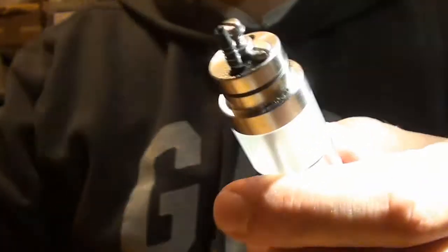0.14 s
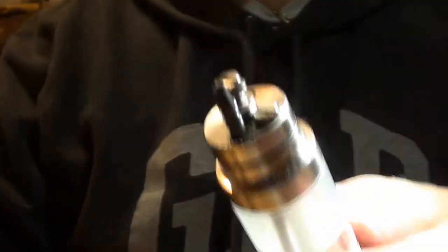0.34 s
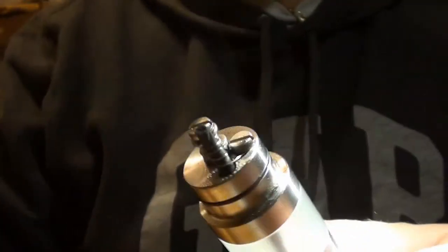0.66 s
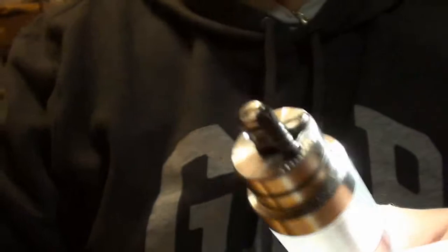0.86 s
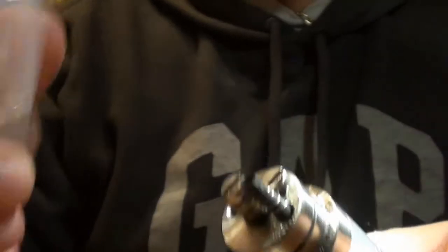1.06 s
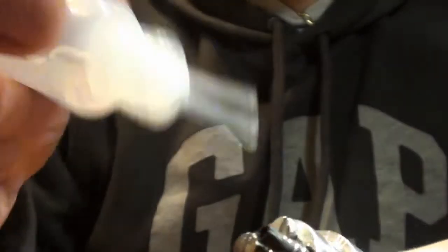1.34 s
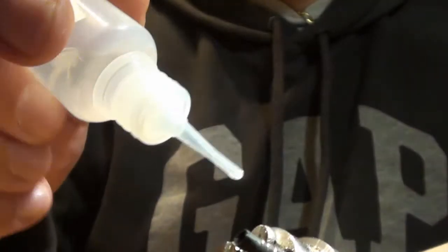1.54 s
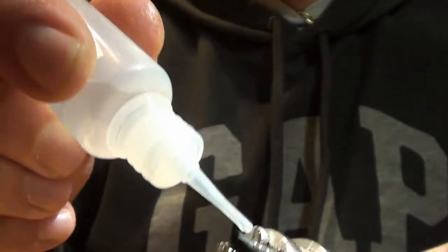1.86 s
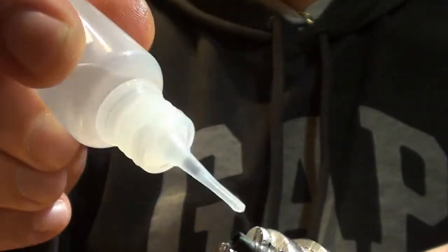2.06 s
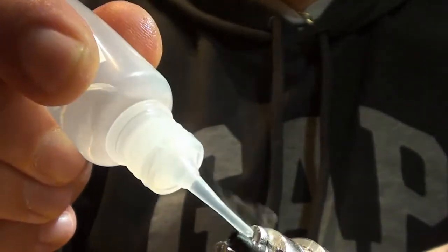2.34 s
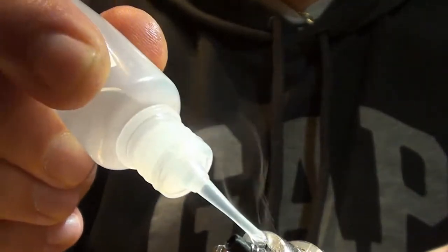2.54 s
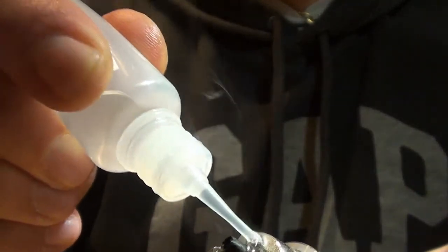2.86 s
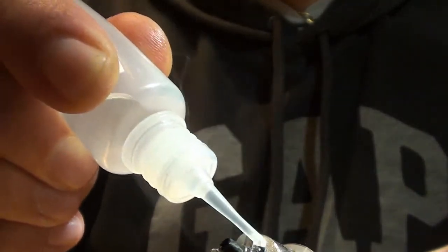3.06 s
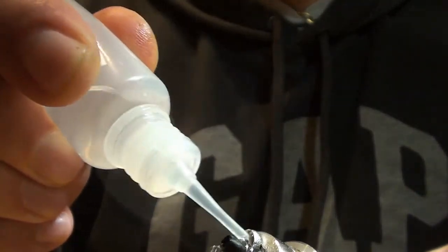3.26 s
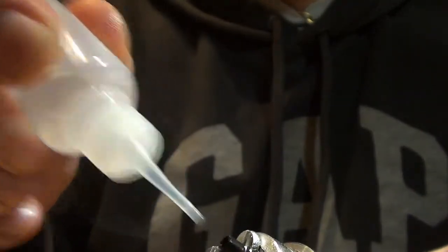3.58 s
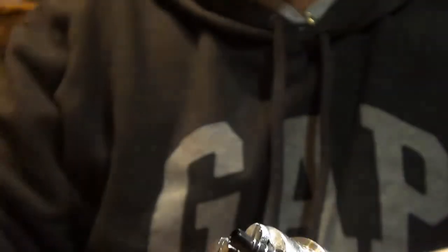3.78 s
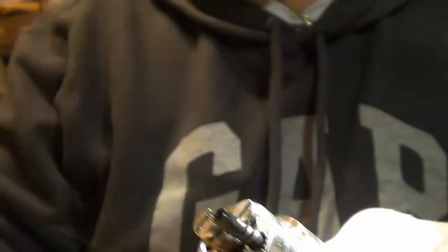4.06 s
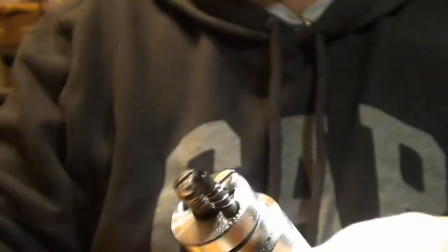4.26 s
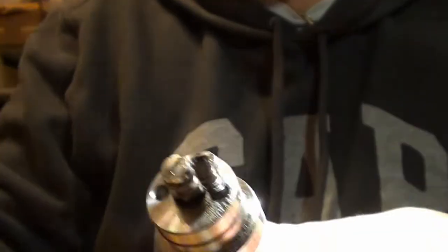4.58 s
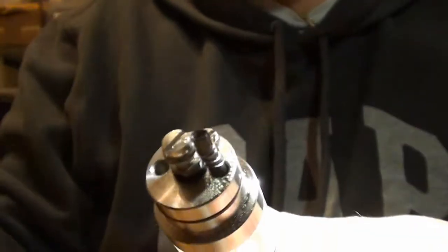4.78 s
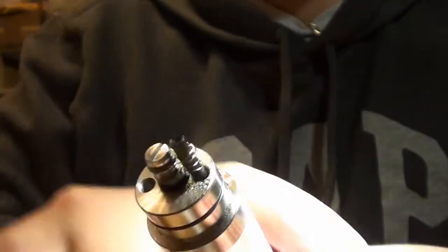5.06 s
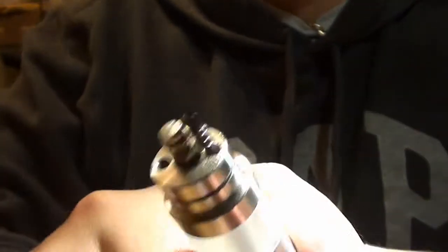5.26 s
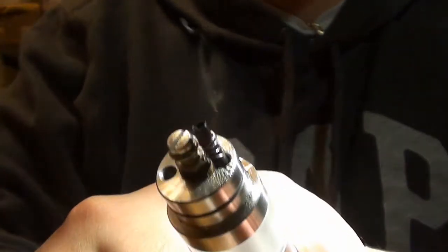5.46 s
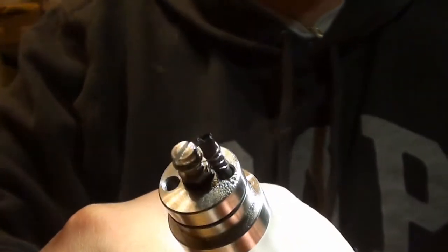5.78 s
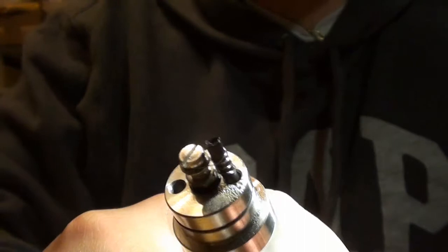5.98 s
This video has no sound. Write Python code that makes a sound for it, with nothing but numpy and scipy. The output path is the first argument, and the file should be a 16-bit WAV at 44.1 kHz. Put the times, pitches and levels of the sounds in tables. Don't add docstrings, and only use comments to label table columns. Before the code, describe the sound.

Fading torch hiss over faint fan hum, a short table scrape, cloth rustle, sharp sizzling pops, a wooden knock, then two crisp spring clicks.

```python
import sys
import numpy as np
from scipy import signal
from scipy.fft import rfft, irfft
from scipy.io import wavfile
from scipy.ndimage import uniform_filter1d, map_coordinates

SR = 44100
rng = np.random.default_rng(int(sys.argv[2]) if len(sys.argv) > 2 else 0)


def materialize(psi):
    bounded = np.clip(np.atleast_2d(psi).T, -1, 1)
    quanta = np.round(bounded * 32767).astype(np.int16)
    wavfile.write(sys.argv[1], SR, quanta)


def magnitude_from_level(level_db):
    exponent = np.asarray(level_db, float) / 20
    return 10 ** exponent


N = 270312


def rms_one(x):
    return x / np.sqrt(np.mean(x ** 2) + 1e-20)


def shaped(x, points):
    points_hz, points_db = np.transpose(points)
    hz = np.maximum(np.fft.rfftfreq(N, 1 / SR), 1)
    db = np.interp(np.log(hz), np.log(points_hz), points_db)
    return irfft(rfft(x) * magnitude_from_level(db), N)


def drift(rate):
    knots = rng.standard_normal(int(N / SR * 60) + 2)
    smooth = uniform_filter1d(knots, max(1, int(30 / rate)), mode="wrap")
    return np.interp(np.arange(N) / SR * 60, np.arange(len(knots)), rms_one(smooth))


def white():
    return rng.standard_normal(N)


def grains(per_s, spread_db):
    sizes = magnitude_from_level(spread_db * np.minimum(rng.exponential(1, N), 5)) * rng.choice([-1, 1], N)
    return sizes * (rng.random(N) < per_s / SR) + 1e-18


def wide(source, spectrum, side):
    mid = rms_one(shaped(source(), spectrum))
    other = rms_one(shaped(source(), spectrum))
    return mid + shaped(other, side) * [[1], [-1]]


def resonances(x, peaks):
    out = 0
    for k, (hz, width, db) in enumerate(peaks):
        r = np.exp(-np.pi * width / SR)
        top = [(1 - r * r) / 2, 0, (r * r - 1) / 2]
        bottom = [1, -2 * r * np.cos(2 * np.pi * hz / SR), r * r]
        out = out + (-1) ** k * magnitude_from_level(db) * signal.lfilter(top, bottom, x)
    return out


def ring(clicks, hz, t60):
    r, w = magnitude_from_level(-60 / (t60 * SR)), 2 * np.pi * hz / SR
    return signal.lfilter([0, np.sin(w)], [1, -2 * r * np.cos(w), r * r], clicks + 1e-18)


def ping(clicks, hz, t60):
    return 2 * ring(resonances(clicks + 1e-18, [(hz, .3 * hz, 0)]), hz, t60)


def short_rings(rows):
    return sum(ping(clicks_at([(s, db)]), hz, t60) for s, db, hz, t60 in rows)


def clicks_at(events, gains=1):
    events = np.array(events)
    clicks = np.zeros(N)
    clicks[np.round(events[:, 0] * SR).astype(int)] = magnitude_from_level(events[:, 1]) * gains
    return clicks


def swells(events):
    t = np.arange(N) / SR
    levels = [db - 10 * np.maximum((s - t) / abs(rise), (t - s) / abs(fall)) for s, db, rise, fall in events]
    return magnitude_from_level(np.max(levels, axis=0))


def band(x, order, low_hz, high_hz):
    return signal.sosfilt(signal.butter(order, [low_hz, high_hz], "band", fs=SR, output="sos"), x)


# (frequency [Hz], level [dB per Hz])
JET_COLOUR = [(500, -52), (1000, -10), (1700, -9), (2080, -3), (2500, -10), (3400, -3.5), (4100, -2.5),
              (5600, -4.5), (7000, -1), (8100, 0), (9000, -3.5), (15800, -8.5)]
# (frequency [Hz], level [dB per Hz])
FLAME_COLOUR = [(80, -20), (200, -7), (400, -1), (800, -13.5), (1600, -21), (3000, -32)]
# (frequency [Hz], side minus mid [dB])
NEAR_WIDTH = [(60, -23), (500, -13), (1650, -13), (5000, -16), (15000, -23)]
# (time [s], jet hiss level [dB])
GAS_FLOW = [
    (0, -44),
    (.28, -46),
    (.36, -49),
    (.45, -52),
    (.8, -65),
    (1.1, -82),
    (1.6, -90),
]
# (time [s], level [dB], rise [s], fall [s])
FLAME_FLARE = [
    (.28, -48, 0.36, .09),
]


def torch():
    n = np.arange(N)
    t = n / SR
    gas_db = np.interp(t, *np.transpose(GAS_FLOW), right=-200)
    jet = wide(white, JET_COLOUR, NEAR_WIDTH)
    bounce_ms = 0.428 + 0.08 * t
    lag = bounce_ms * SR / 1000
    bounce = np.array([map_coordinates(ear, [n - lag], order=3, mode="wrap") for ear in jet])
    jet = jet + .56 * bounce
    low = signal.sosfiltfilt(signal.butter(3, 9800, fs=SR, output="sos"), jet)
    top_db = np.maximum(-3 + 1.1 * (gas_db - gas_db[0]), -8)
    jet = low + magnitude_from_level(top_db) * (jet - low)
    roar = wide(white, FLAME_COLOUR, NEAR_WIDTH) * magnitude_from_level(0.5 * drift(12))
    flame = np.maximum(magnitude_from_level(-50 - 10 * t), swells(FLAME_FLARE))
    return magnitude_from_level(gas_db) * jet * magnitude_from_level(0.53 * drift(18)) + flame * roar


# (frequency [Hz], level [dB per Hz])
AIR_COLOUR = [(15, -53), (25, -29), (110, -15.5), (137, -10), (242, -6.5), (353, -11.5), (426, -9.5),
              (462, -9), (908, -14.5), (1070, -17), (1440, -18.5), (2210, -21.5), (6700, -25.5),
              (8090, -25.5), (15900, -26.5)]
# (frequency [Hz], side minus mid [dB])
AIR_WIDTH = [(60, -15), (200, -13.5), (400, -7), (800, -2.5), (1800, -1), (4400, -6.5), (8000, -9),
             (15000, -19.5)]
# (frequency [Hz], width [Hz], rms level [dB])
FAN_BANDS = [(425, 14, -78), (928, 15, -74.5), (4755, 300, -73), (7540, 66, -74.5)]


def background():
    air = magnitude_from_level(-54.5) * wide(white, AIR_COLOUR, AIR_WIDTH) * magnitude_from_level(.5 * drift(4))
    fan = 0
    for hz, width, db in FAN_BANDS:
        peak = [(hz, width, 0)]
        fan = fan + magnitude_from_level(db) * rms_one(resonances(resonances(white(), peak), peak))
    blade_hz = 427.4 + 1.55 * drift(2.95)
    blades = magnitude_from_level(-64 + 3) * np.sin(2 * np.pi * np.cumsum(blade_hz) / SR)
    return air + fan + blades


# (frequency [Hz], width [Hz], level [dB])
TABLE_RINGING = [(291, 110, -6), (540, 61, 2.5), (794, 160, -4), (1260, 210, -0.5), (1660, 230, -0.5),
                 (1990, 450, -3), (2900, 290, -6), (3620, 580, -7.5)]
# (time [s], body level [dB], bright edge level [dB], rise [s], fall [s])
TABLE_SHOVES = [
    (.408, -32.5, -47, 0.0071, 0.05),
    (.482, -38, -53, 0.024, 0.082),
    (.506, -37.5, -64, .012, .07),
    (.527, -32.5, -41, 0.016, 0.076),
    (.615, -35, -62, 0.0054, .02),
    (.635, -50, -67, .02, .06),
]


def drag():
    slips = grains(7000, spread_db=2.5) * magnitude_from_level(.8 * drift(30))
    edge = band(slips, 2, 4500, 9500)
    body = swells(np.delete(TABLE_SHOVES, 2, axis=1))
    grit = swells(np.delete(TABLE_SHOVES, 1, axis=1))
    return body * rms_one(resonances(slips, TABLE_RINGING)) + grit * rms_one(edge)


# (frequency [Hz], level [dB per Hz])
CLOTH_COLOUR = [(880, -7), (1500, -22), (1840, -10), (2550, -5), (3750, -0.5), (5840, -2), (7210, 1),
                (11700, -11), (15000, -20)]
# (frequency [Hz], level [dB per Hz])
RUB_COLOUR = [(250, -25), (500, 10), (750, 3), (1200, 3), (1550, 1), (1950, 2.5), (2300, -3.5), (2650, -6),
              (3200, -45)]
# (time [s], rustle level [dB], dull rubbing level [dB], rise [s], fall [s])
ARM_MOVES = [(.72, -57.5, -77, .05, 0.29), (.94, -55.5, -82, .4, 0.57), (1.09, -53, -60, 0.33, .07),
             (1.15, -47.5, -61, 0.089, 0.042), (1.205, -49.5, -68, 0.031, .022),
             (1.27, -58, -62.5, 0.13, 0.39), (1.39, -51.5, -66, 0.029, .025), (1.56, -59, -63, 0.18, 0.16),
             (3.445, -58, -56.5, .022, .04), (3.74, -57, -60, .06, .15), (3.82, -52, -59.5, .12, 0.12),
             (4.01, -55.5, -59.5, 0.62, 0.32), (4.452, -55, -45.5, 0.009, 0.02),
             (4.6, -63, -61.5, 0.26, 0.7), (4.82, -55.5, -60.5, 0.16, 0.23),
             (5.001, -55, -45.5, 0.0046, 0.063), (5.09, -65, -53, .1, 0.068),
             (5.17, -52.5, -57.5, 0.16, 0.17), (5.255, -59.5, -49, 0.06, 0.095),
             (5.335, -51.5, -61, 0.11, 0.064), (6.12, -58.5, -69, 0.22, .2)]


def sleeves():
    cloth = wide(lambda: grains(15000, spread_db=0.0), CLOTH_COLOUR, NEAR_WIDTH) * magnitude_from_level(0.87 * drift(25))
    rub = wide(white, RUB_COLOUR, NEAR_WIDTH) * magnitude_from_level(1.4 * drift(25))
    rustle = swells(np.delete(ARM_MOVES, 2, axis=1))
    dull = swells(np.delete(ARM_MOVES, 1, axis=1))
    return rustle * cloth + dull * rub


# (time [s], peak level [dB], pitch [Hz], t60 [s])
SMALL_TICKS = [(1.065, -52, 2960, 0.0054), (3.445, -42, 2140, 0.005), (3.81, -39, 2510, 0.003),
               (4.0098, -34, 4000, 0.0035), (4.0099, -46, 5600, 0.0045), (4.0101, -40, 7160, 0.0049),
               (4.4416, -24.5, 6200, 0.0015), (4.4418, -34.5, 8600, 0.0027), (4.442, -28.5, 2640, 0.0032),
               (4.4415, -31, 3870, 0.0013), (4.4502, -44, 7000, .005), (4.453, -58, 10900, .04),
               (4.7387, -36, 3700, 0.0022), (4.7388, -44, 2220, 0.0038), (5.183, -43, 8600, .008),
               (5.183, -49, 5000, 0.0086), (5.237, -54.5, 2610, 0.084), (5.275, -58, 2640, 0.12),
               (5.253, -50, 2470, 0.035)]


def ticks():
    return short_rings(SMALL_TICKS)


# (frequency [Hz], width [Hz], level [dB])
COIL_RINGING = [(2000, 630, -11.5), (4200, 750, -4), (6600, 1400, -4), (8500, 1120, 2), (12300, 4400, -10)]
# (time [s], peak level [dB])
LARGE_SPITS = [(1.9775, -44), (1.9834, -30), (2.2397, -25.5), (2.244, -33), (2.2502, -26), (2.2821, -22),
               (2.2848, -19), (2.2878, -26), (2.293, -19), (2.295, -8.5), (2.2989, -12.5), (2.3122, -18),
               (2.3417, -19.5), (2.3465, -17.5), (2.3549, -16), (2.3607, -13.5), (2.3789, -31),
               (2.4015, -24.5), (2.4243, -18.5), (2.4339, -23), (2.4431, -24), (2.4664, -22), (2.4928, -28),
               (2.504, -27), (2.531, -22), (2.5575, -34), (2.5828, -34), (2.9797, -36.5), (3.0393, -33),
               (3.2217, -39)]
# (time [s], length [s], level at start [dB], level at end [dB])
BOIL_BURSTS = [(1.975, 0.014, -43, -45.5), (2.238, 0.015, -38, -54), (2.256, 0.024, -55, -52),
               (2.281, 0.02, -37, -36), (2.306, 0.025, -38, -56), (2.332, 0.029, -53, -43.5),
               (2.363, 0.028, -50, -57), (2.392, 0.047, -57, -51), (2.427, 0.01, -35.5, -60),
               (2.438, 0.046, -47, -54), (2.514, 0.021, -46.5, -45), (2.539, 0.014, -51, -59),
               (2.556, 0.0048, -45, -53)]


def coil():
    t = np.arange(N) / SR
    edge_s = .003
    bursts = 0
    for s, length, start, end in BOIL_BURSTS:
        times = [s - edge_s, s, s + length, s + length + edge_s]
        bursts = bursts + magnitude_from_level(np.interp(t, times, [start - 15, start, end, end - 15], -200, -200))
    fizz = rms_one(resonances(grains(12000, spread_db=2.4), COIL_RINGING))
    small = magnitude_from_level(12.5) * bursts * grains(300, spread_db=3.5)
    luck = magnitude_from_level(rng.normal(0, 3, (len(LARGE_SPITS), len(COIL_RINGING) + 1)))
    luck = luck * rng.choice([-1, 1], (len(LARGE_SPITS), 1))
    spits = [clicks_at(LARGE_SPITS, gains) + small for gains in luck.T]
    rung = sum((-1) ** k * resonances(spits[k], [peak]) for k, peak in enumerate(COIL_RINGING))
    snap = band(spits[-1], 1, 2000, 12000)
    pops = magnitude_from_level(12.0) * rung + magnitude_from_level(-3.0) * snap
    return bursts * fizz + pops + 0.18 * np.roll(pops, 11)


# (time [s], peak level [dB], contact cut-off [Hz])
TABLE_KNOCKS = [
    (4.4414, -19.5, 2390),
    (4.51, -35.5, 600),
    (4.688, -36.5, 604),
    (4.7376, -33.5, 1520),
    (4.771, -36, 1200),
    (4.999, -52, 2000),
    (5.031, -48, 2000),
    (5.253, -42.5, 1500),
    (5.312, -44, 900),
]
# (frequency [Hz], level [dB], t60 [s])
WOOD_RINGING = [(102, -20, 0.023), (148, -12, 0.054), (212, -5.5, 0.046), (250, -1, 0.049),
                (304, -11, 0.21), (351, -1, 0.14), (437, -13, 0.079), (564, 2.5, 0.029), (712, -1.5, 0.047),
                (853, -4.5, 0.085), (1280, 0.5, 0.013), (1610, -13.5, 0.055), (2220, -7, 0.016),
                (2630, -13, 0.058)]


def knocks():
    pushes = np.array([band(clicks_at([(s, db)]) + 1e-18, 2, 95, hz) for s, db, hz in TABLE_KNOCKS])
    push = pushes.sum(axis=0)
    spot = magnitude_from_level(rng.normal(0, 1.5, (len(TABLE_KNOCKS), len(WOOD_RINGING))))
    wood = 0
    for k, (hz, db, t60) in enumerate(WOOD_RINGING):
        wood = wood + (-1) ** k * magnitude_from_level(db) * ring(spot[:, k] @ pushes, hz, t60)
    t = np.arange(N) / SR - 3.74
    jolt = magnitude_from_level(-50) * np.exp(-(t / 0.01) ** 2) * np.sin(2 * np.pi * 61.6 * t)
    thud = magnitude_from_level(4) * ring(push, 386, 0.013)
    return jolt - magnitude_from_level(7.0) * push - thud - magnitude_from_level(-6.5) * wood


# (time [s], peak level [dB], brightness above 10 kHz [dB], touches [count])
SWITCH_CONTACTS = [(5.2919, -24, -4, 1), (5.306, -41, -15, 1), (5.3086, -21, -18, 1), (5.3099, -25, -10, 1),
                   (5.3141, -29, -14, 3), (5.3207, -12, -9, 3), (5.3242, -23, -5, 1), (6.0455, -36, 0, 1),
                   (6.0462, -28, -2, 1), (6.049, -44, -8, 3), (6.055, -44, 0, 4), (6.061, -23, 0, 1),
                   (6.0621, -7.5, 2, 1), (6.064, -25, 0, 1), (6.071, -36, -8, 1)]
# (frequency [Hz], level [dB], t60 [s])
SPRING_RINGING = [(4000, -15, 0.0021), (5600, -7, 0.0012), (6550, -11, 0.0049), (7100, -9.5, 0.0042),
                  (8410, 3, 0.0027), (9300, -35, 0.0014), (11100, -22, .004), (12160, -11, 0.0049),
                  (15300, -15, 0.0026), (7850, -19, 0.0075), (8600, -49, 0.31), (7500, -56, .15)]


def switch():
    touches = []
    for s, db, bright, count in SWITCH_CONTACTS:
        for k in range(count):
            later = .00117 * k * (1 - .105 * (k - 1))
            touches.append((s + later, db + 1.5 * k, bright))
    touches = np.array(touches)
    luck = magnitude_from_level(rng.normal(0, 1.5, (len(touches), len(SPRING_RINGING))))
    luck = luck * (-1) ** np.arange(len(SPRING_RINGING))
    luck = luck * magnitude_from_level(np.outer(touches[:, 2], np.array(SPRING_RINGING)[:, 0] > 10000))
    out = 0
    for k, (hz, db, t60) in enumerate(SPRING_RINGING):
        out = out + magnitude_from_level(db) * ping(clicks_at(touches, luck[:, k]), hz, t60)
    return magnitude_from_level(-5.5) * out


# (time [s], peak level [dB], pitch [Hz], t60 [s])
HOUSING_RINGS = [
    (5.322, -33, 2340, 0.0033),
    (5.3225, -45, 1440, 0.007),
    (5.33, -75, 8600, 0.17),
    (6.0625, -37.5, 2000, 0.0086),
    (6.0625, -24, 3800, 0.004),
]


def housing():
    return short_rings(HOUSING_RINGS)


def room(x):
    t = np.arange(int(.4 * SR)) / SR
    t60_s, wall_cut_hz = 0.24, 4300
    mid, side = rng.standard_normal((2, len(t))) * magnitude_from_level(-60 * t / t60_s) * (t > .0015)
    side = signal.sosfilt(signal.butter(1, 900, "high", fs=SR, output="sos"), side)
    tail = mid + 0.75 * side * [[1], [-1]]
    tail = signal.sosfilt(signal.butter(1, wall_cut_hz, fs=SR, output="sos"), tail)
    tail = tail / np.sqrt(np.sum(tail[0] ** 2))
    return magnitude_from_level(-30) * signal.fftconvolve(x[None], tail, axes=1)[:, :N]


def scene():
    table = drag() + ticks() + knocks()
    near = coil() + switch() + housing()
    hand = magnitude_from_level(-22) * np.roll(near, round(.0007 * SR)) * [[1], [-1]]
    dry = near + hand + table * magnitude_from_level(np.array([[.3], [-.3]]))
    return dry + room(near + magnitude_from_level(19.5) * table) + torch() + sleeves() + background()


def band_limit(x):
    return signal.sosfilt(signal.butter(12, 16640, fs=SR, output="sos"), x)


def record(dry):
    top_cut = signal.ellip(12, .3, 60, 15780, fs=SR, output="sos")
    mix = signal.sosfilt(top_cut, dry)
    return band_limit(mix)


dry = scene()
out = record(dry)
materialize(out)
```